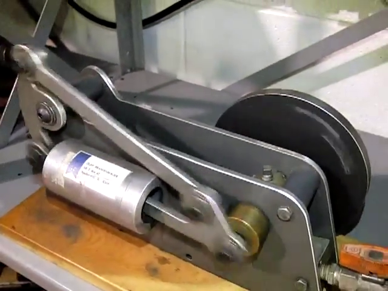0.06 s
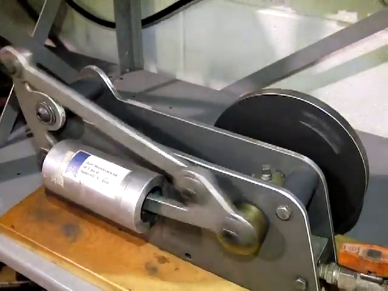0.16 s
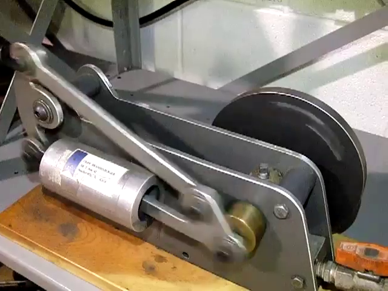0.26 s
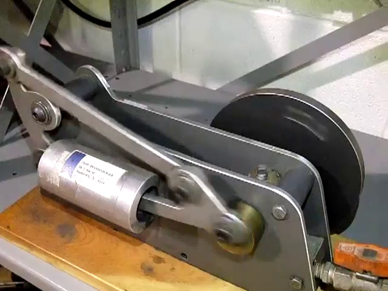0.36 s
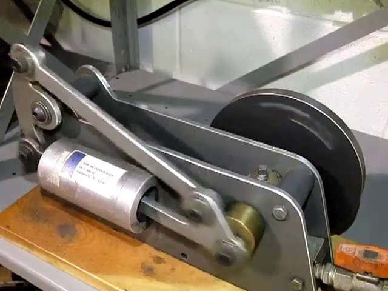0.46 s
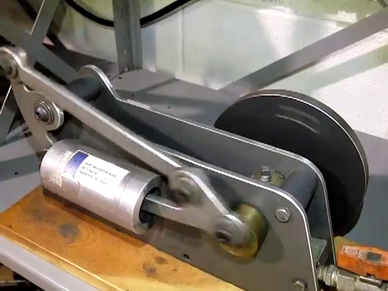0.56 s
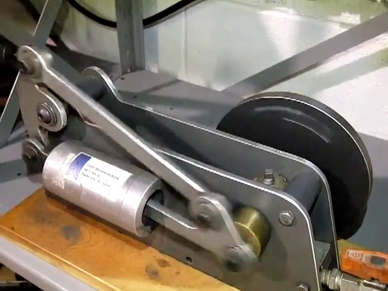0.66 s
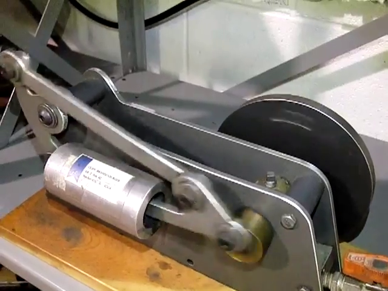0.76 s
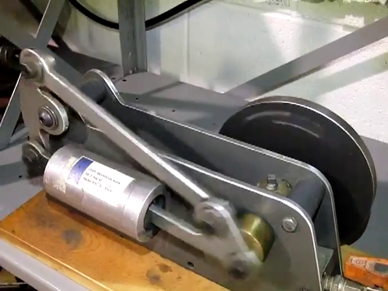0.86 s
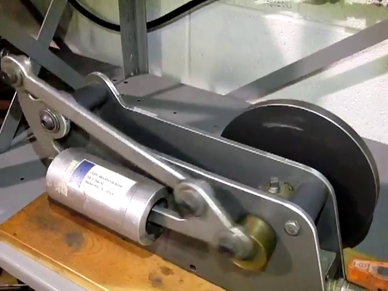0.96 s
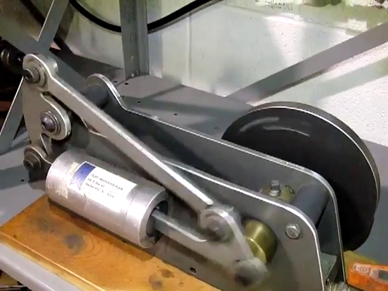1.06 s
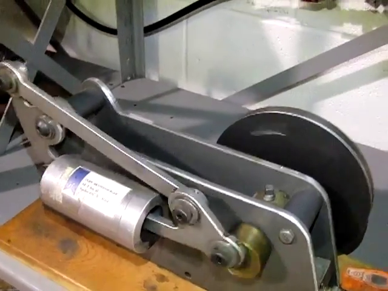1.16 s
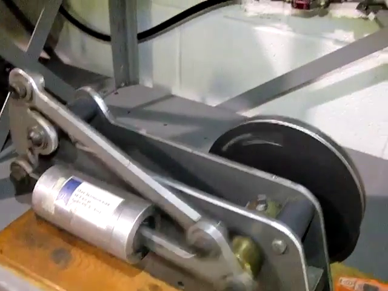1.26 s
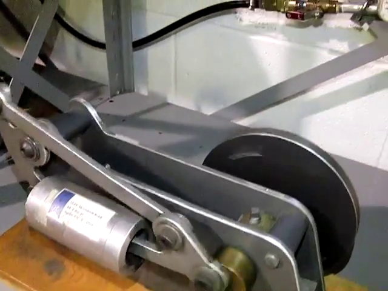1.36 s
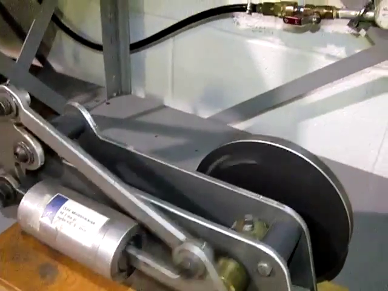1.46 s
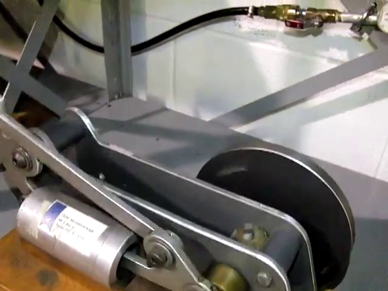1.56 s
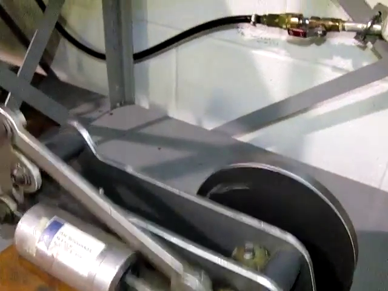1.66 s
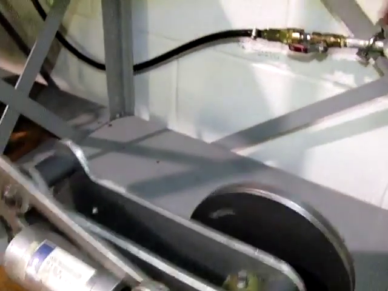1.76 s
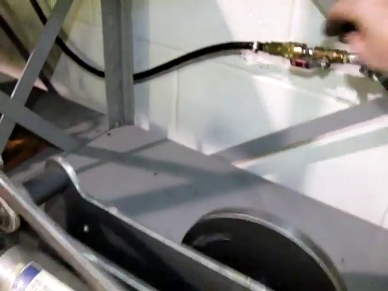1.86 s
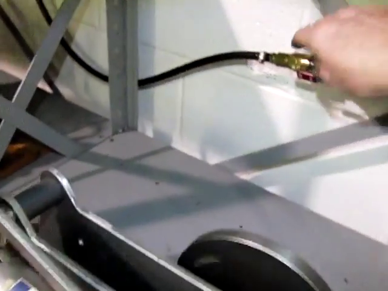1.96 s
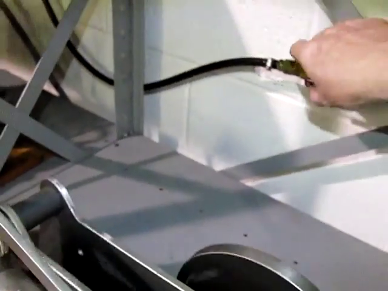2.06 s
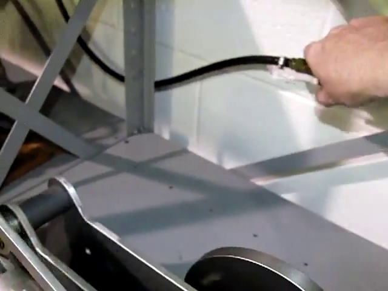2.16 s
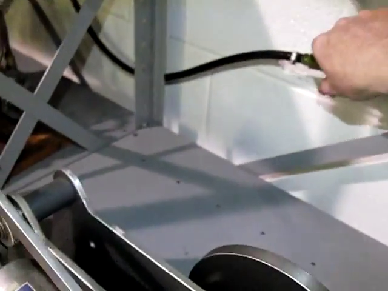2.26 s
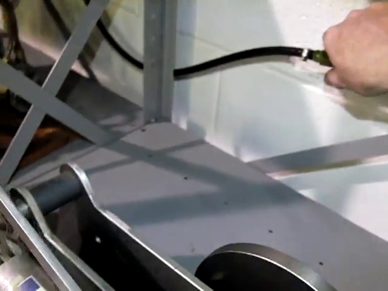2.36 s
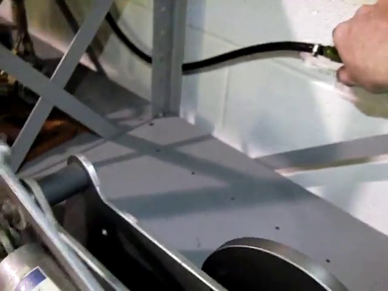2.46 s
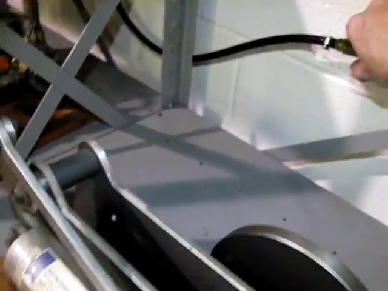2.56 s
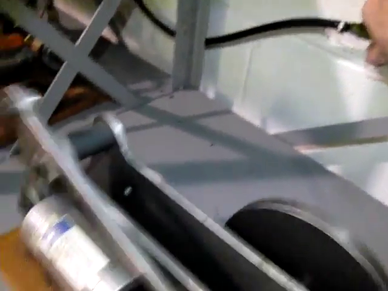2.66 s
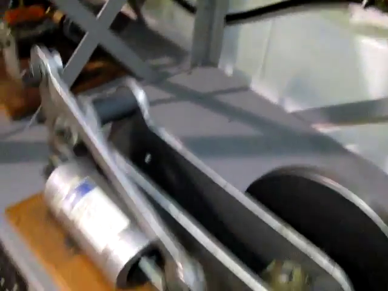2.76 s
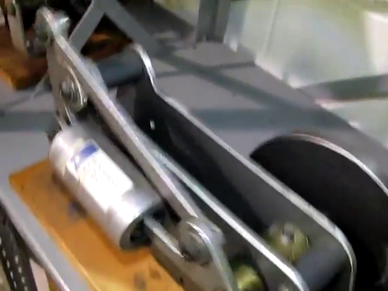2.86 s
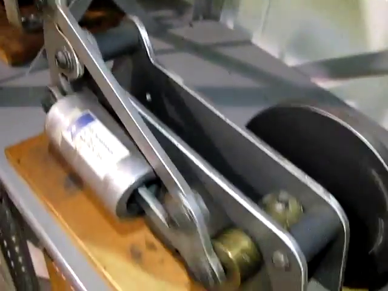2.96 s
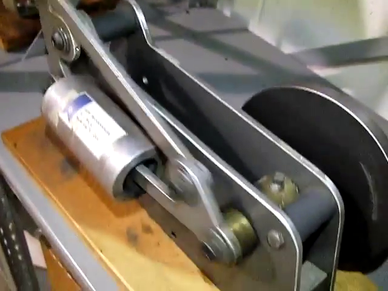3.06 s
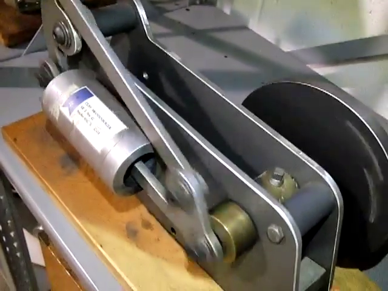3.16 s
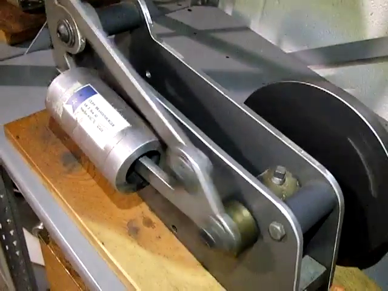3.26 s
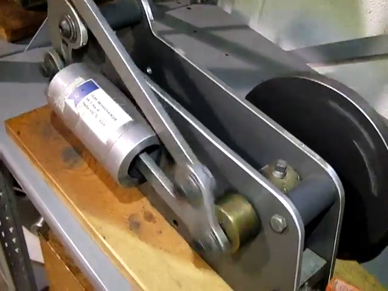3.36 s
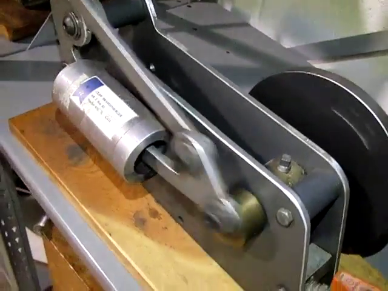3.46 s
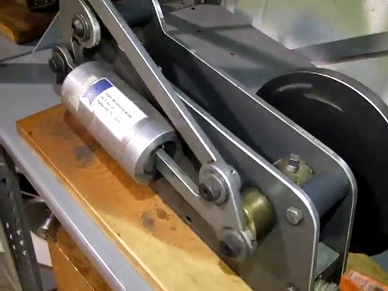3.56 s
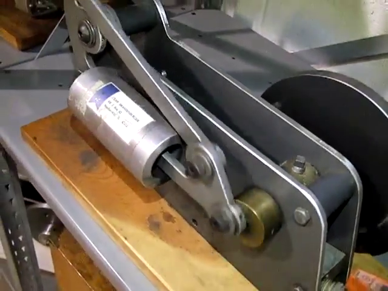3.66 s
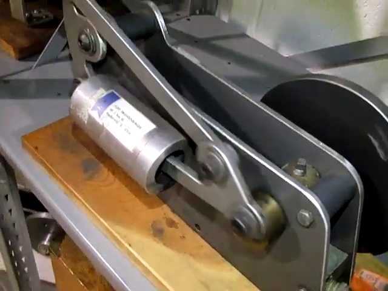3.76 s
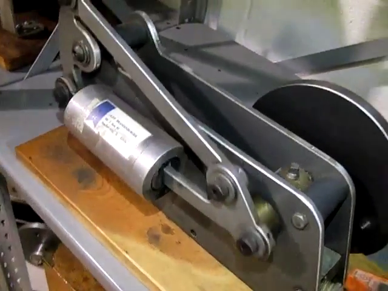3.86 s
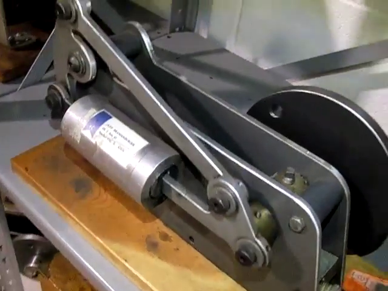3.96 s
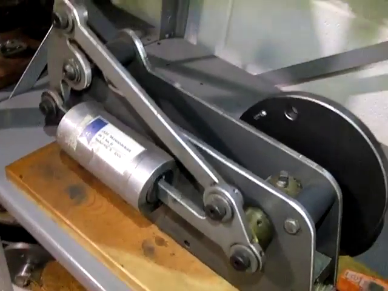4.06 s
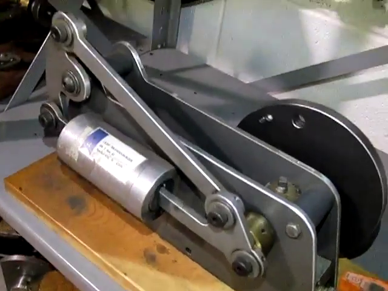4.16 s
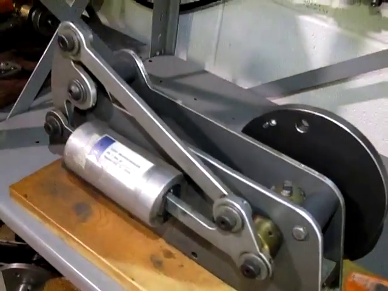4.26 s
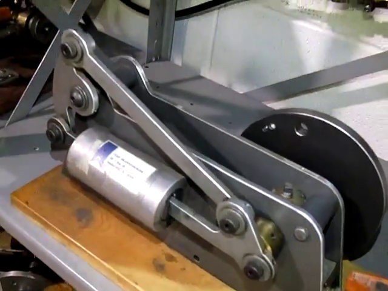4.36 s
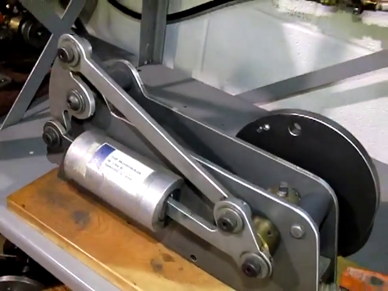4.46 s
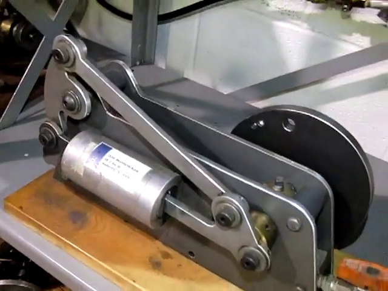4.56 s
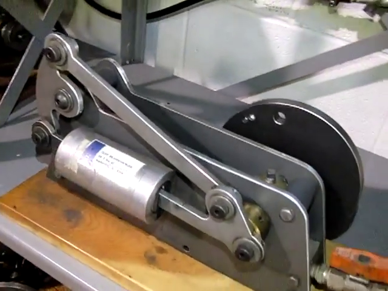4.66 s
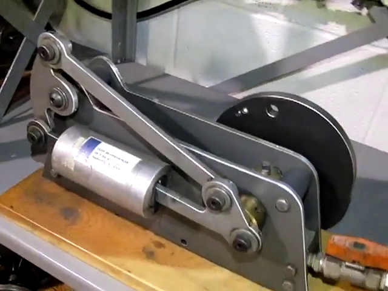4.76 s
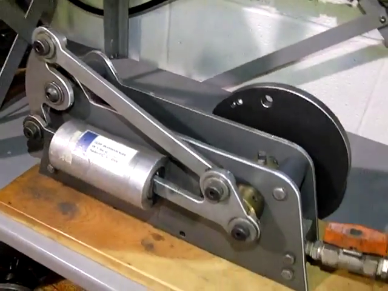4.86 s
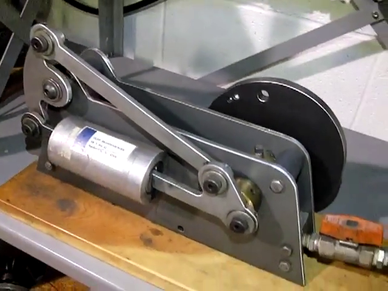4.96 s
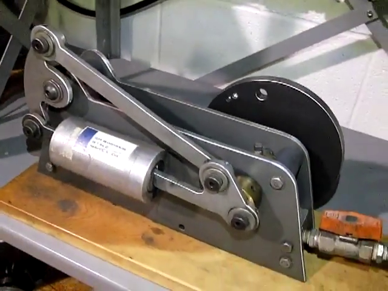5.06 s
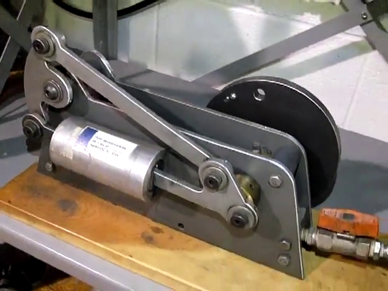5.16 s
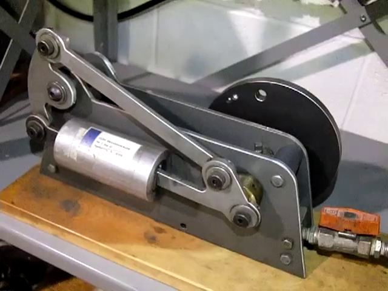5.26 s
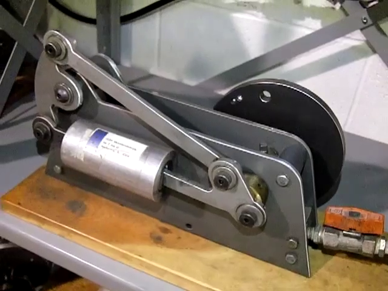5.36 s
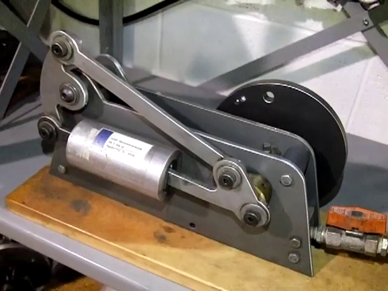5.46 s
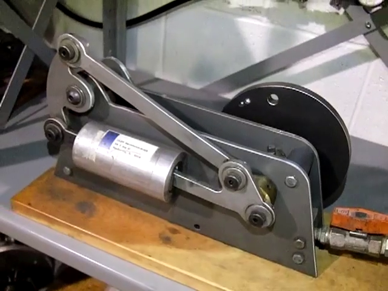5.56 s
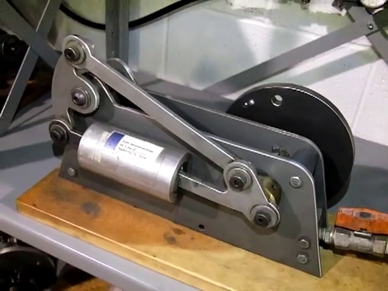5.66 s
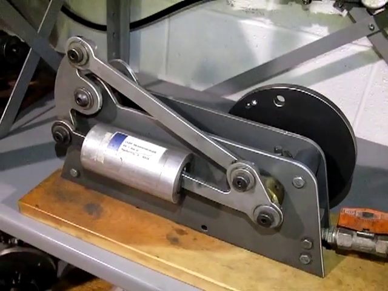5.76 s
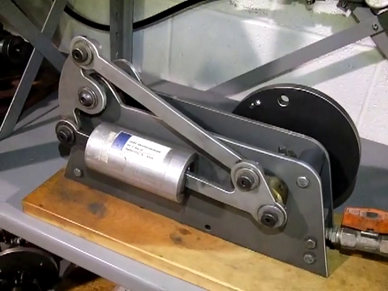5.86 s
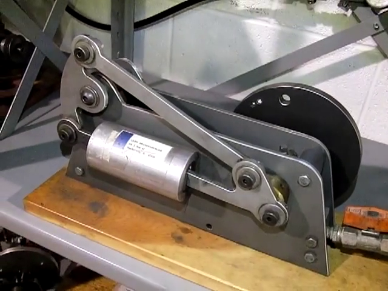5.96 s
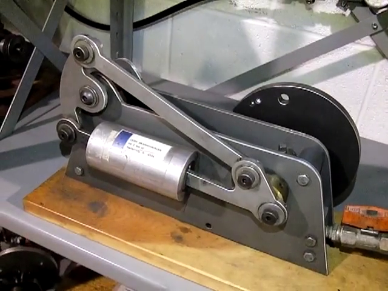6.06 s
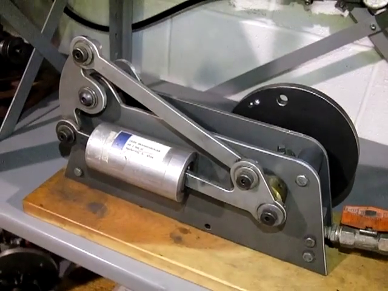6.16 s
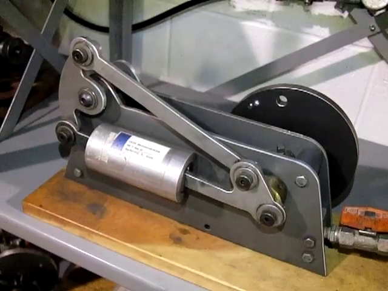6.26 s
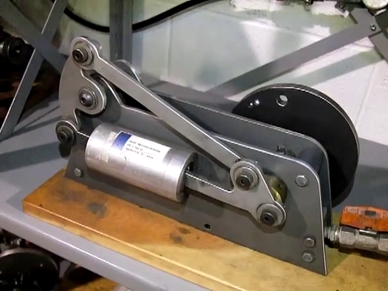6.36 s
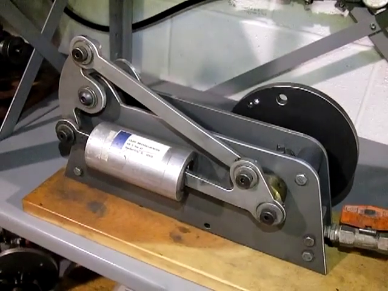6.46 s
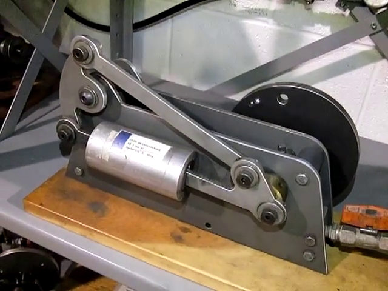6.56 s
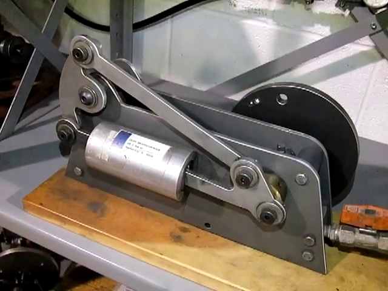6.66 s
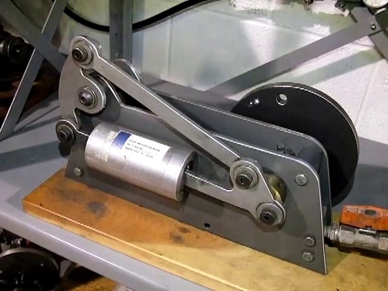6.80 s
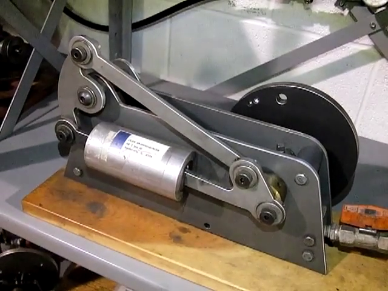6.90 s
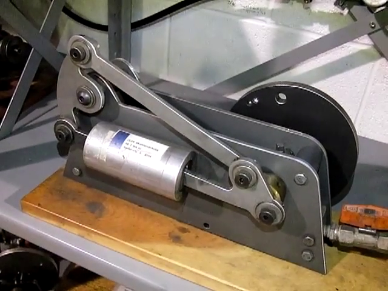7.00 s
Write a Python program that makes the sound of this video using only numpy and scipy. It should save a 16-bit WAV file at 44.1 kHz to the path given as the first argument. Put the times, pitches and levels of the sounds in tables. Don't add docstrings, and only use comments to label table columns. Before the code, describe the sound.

Close, rapid metallic knocking with puffing, hissing air stops after about four seconds; quiet ventilation rumble and lamp buzz remain, with one small tick.

```python
import sys
import numpy as np
from scipy import signal
from scipy.fft import rfft, irfft, next_fast_len
from scipy.io import wavfile
from scipy.ndimage import uniform_filter1d, map_coordinates

SR = 44100
rng = np.random.default_rng(int(sys.argv[2]) if len(sys.argv) > 2 else 0)


def nominal_scale(level):
    x = np.asarray(level, float) / 20
    return 10 ** x


def generate_wav(signal):
    frames = np.transpose(np.atleast_2d(signal))
    scaled = np.clip(frames, -1, 1) * 32767
    pcm = np.round(scaled).astype(np.int16)
    wavfile.write(sys.argv[1], SR, pcm)


N = 310023
T = np.arange(N) / SR

# dead centre t/s, blow level/dB, rebound level/dB, air pressure level/dB, valve snap level/dB
POWERED_TURNS = [(-0.011, -1, -5, -29, -16.5), (0.194, -4, -7, -29, -15.5), (0.4, -5, -5.5, -29, -19),
                 (0.606, -3, -7, -28, -15), (0.813, -3, -8.5, -29, -16.5), (1.02, -3.5, -6, -29, -17.5),
                 (1.227, -2.5, -7, -29, -15.5), (1.434, -2.5, -7, -29.5, -17),
                 (1.64, -3.5, -6.5, -27.5, -16.5), (1.847, -1.5, -4.5, -28.5, -15.5),
                 (2.053, -2.5, -3, -28, -19), (2.26, -3.5, -3.5, -27, -12), (2.466, -1.5, -5.3, -28, -13),
                 (2.674, -2, -5, -28, -12), (2.88, -1.4, -3.5, -26.5, -15), (3.087, -1, -6.5, -25.5, -12),
                 (3.294, -0.3, -5, -27, -12.5)]
# dead centre t/s, valve snap t/s, air pressure level/dB, snap level/dB
COASTING_TURNS = [
    (3.502, 3.705, -32.5, -19),
    (3.778, 3.875, -43.5, -60),
]
# t/s after dead centre, links level/dB, side plates level/dB, valve spit level/dB
TURN_CONTACTS = [
    (-0.017, -26, -23, -30),
    (0.0, -0.2, -16, -11),
    (0.0095, -1.1, -6.5, -15),
    (0.051, -19.5, -21.5, -55),
    (0.063, -12, -24.5, -55),
    (0.0885, -16, -13.5, -22),
    (0.109, -23, -24, -50),
]
# t/s, links level/dB, side plates level/dB, valve spit level/dB
COASTING_CONTACTS = [
    (3.485, -22, -52, -60),
    (3.505, -6, -13, -32),
    (3.514, -7.5, -42, -34),
    (3.557, -10.5, -12, -44),
    (3.603, -12.5, -14, -9.5),
    (3.743, -23.5, -19, -42),
    (3.783, -20, -24, -39),
    (3.827, -16.5, -19.5, -49),
    (3.831, -25, -41, -58),
    (4.032, -23, -20, -58),
]
# crank angle [0-1], level/dB
AIR_FLOW = [(0.02, 0.8), (.21, -1.5), (.3, -19), (.4, -6), (.5, -13.5), (.64, -2), (.755, 2.5), (.88, -6),
            (.965, -17)]
# t/s, level/dB
SHAKE = [(0.0, -28.5), (0.12, -40), (0.19, -33.5), (0.7, -36), (1.69, -34.5), (3.06, -32), (3.33, -30.5),
         (3.44, -34.5), (3.56, -28.5), (3.7, -39.5), (3.85, -38), (4.1, -61)]
# f/Hz, width f/Hz, level/dB
LINK_MODES = [(861, 100, -4), (917, 350, -8.5), (1306, 107, 0.5), (1403, 182, -2), (1720, 233, -6.5),
              (1913, 120, -2), (2160, 270, -6)]
# f/Hz, width f/Hz, level/dB
STEEL_EDGE_MODES = [(1330, 830, 0.3), (3470, 710, 1)]
# f/Hz, width f/Hz, level/dB
PLATE_MODES = [(526, 26, -6), (667, 30, 2), (755, 70, -17)]
# f/Hz, width f/Hz, level/dB
BENCH_MODES = [(43, 4.1, -3.5), (140.3, 31.4, -3), (196.4, 19, -2.5), (263, 61.5, -5.5), (366.5, 17.4, -1),
               (436.7, 92, -8)]
# f/Hz, width f/Hz, level/dB
THROAT_MODES = [(1373, 1000, -4), (2230, 630, 1), (3080, 400, 3.65), (3640, 626, 3), (4400, 384, -1.5),
                (5020, 730, -11)]
# f/Hz, width f/Hz, level/dB
OUTLET_MODES = [(1430, 420, -6.3), (1850, 224, -3), (2330, 225, 2.5)]
# f/Hz, width f/Hz, level/dB
JET_MODES = [(10500, 1460, 2), (11100, 1900, 3), (12140, 2800, -5)]
# f/Hz, width f/Hz, level/dB
WHISTLE_MODES = [(11000, 440, -19), (11700, 160, -6), (10930, 1530, -11), (14100, 1200, -17)]
# f/Hz, width f/Hz, level/dB
TICK_MODES = [(900, 240, -5), (1790, 52, 8), (2070, 80, 5.5), (2500, 70, 11.5), (3250, 270, -3.5),
              (6000, 3000, -21), (10700, 2500, -20)]
# t/s, level/dB
TICK_TIMES = [
    (4.896, -22.5),
    (4.904, -25),
    (4.913, -42),
    (4.925, -30),
    (4.934, -38),
    (5.57, -45),
    (5.76, -45),
    (6.23, -46),
]
# f/Hz, likeness [0-1]
ENGINE_LIKENESS = [(60, .99), (250, 1), (500, 0.91), (1000, 0.73), (3000, 0.8), (7500, 0.74), (10500, 0.85),
                   (15000, 0.74)]
# f/Hz, likeness [0-1]
ROOM_LIKENESS = [(60, 1), (300, 0.58), (800, 0.033), (3000, 0.75), (15000, 0.75)]
# f/Hz, time to fall 60 dB t/s
ECHO_DECAY = [(150, 0.53), (1000, 0.047), (8000, 0.028)]
# f/Hz, level/dB per Hz
RUMBLE_COLOUR = [(12, -26), (25, 5.5), (45, 0), (110, 0), (145, -9.5), (250, -14), (500, -23.5),
                 (1000, -26.5), (2200, -34.5), (3500, -32.5), (6000, -35.5), (15800, -39)]
# overtone of the buzz pitch [number], level/dB
LAMP_OVERTONES = [(1, -52.5), (2, -64.5), (3, -49), (4, -72), (7, -77), (9, -74.5), (10, -64.5), (11, -80),
                  (12, -69.5), (14, -62), (15, -64), (16, -68.5), (17, -69), (18, -75), (19, -67.5),
                  (21, -73), (22, -76)]
# t/s, level/dB
LAMP_OPENS = [(4.3, -0.5), (5.0, 7.5)]
# f/Hz, left leads [radians]
STEREO_LEAD = [(0, 0), (430, -.3), (780, -.1), (1210, -1.8), (1810, -2.3), (2760, -3.1), (15300, -3.2)]
# f/Hz, left minus right level/dB
STEREO_LEAN = [(60, 2.5), (110, -1.5), (200, 0), (380, 1.5), (700, 2.5), (1290, 2), (2380, -5), (4400, -1),
               (8120, -1.5), (15000, -1.5)]
# f/Hz, width f/Hz
MIC_NOTCHES = [(2860, 466), (4990, 160)]
# f/Hz, level/dB per Hz
MIC_HISS = [(700, -22), (1600, -3.5), (2400, -3), (3500, -23), (10000, -21), (13500, -21), (15800, -2)]

REST_S, SNAP_ANGLE = 4.006, 0.755
SNAP_AFTER_S = 0.1595
INTAKE_OVER_DB, EXHAUST_OVER_DB = 1.36, 0.5
WHISTLE_GROWS, WHISTLE_DB = 1.16, -5.5
POP_DB, POP_ANGLE = 8, 0.0067
PER_TURN = 7
BLOW, REBOUND = 1, 2
SCATTER_DB, SCATTER_S = 2.5, 0.000818
RING_FADES_DB_PER_S = 0.56
SHORTER_PER_DB, CHATTER_RISE_S = 1.12, 0.001
ROLL_OUT_S, ROLL_OUT_DB_PER_S = 3.86, 170
MAINS_HZ, SCAN_HZ = 120.02, 15734.3
UPPER_ORDER = 16
LOW_CUT_HZ = 30
FRAME = 256


def unit(x):
    return x / np.sqrt(np.mean(x ** 2) + 1e-20)


def along(points, hz):
    f, value = np.transpose(points)
    return np.interp(np.log(hz + 1), np.log(f + 1), value)


def filtered(x, response):
    size = next_fast_len(N + SR // 4)
    spectrum = rfft(x, size) * response(np.fft.rfftfreq(size, 1 / SR))
    return irfft(spectrum, size)[..., :N]


def body(modes):
    def response(f):
        total = 0
        for k, (centre, width, db) in enumerate(modes):
            damping = 1j * f * width
            total = total + (-1) ** k * nominal_scale(db) * damping / (centre ** 2 - f ** 2 + damping)
        return total
    return response


def wobble(rate):
    knots = rng.standard_normal(int(N * rate / SR) + 4)
    return map_coordinates(knots, [np.arange(N) * rate / SR])


def rush(response, alike, patchy_db):
    z = signal.stft(rng.standard_normal((2, N)), nperseg=FRAME)[2]
    patches = uniform_filter1d(rng.standard_normal(z.shape[1:]), size=2, axis=0)
    patches = uniform_filter1d(patches, size=8, axis=1)
    pair = signal.istft(z * nominal_scale(patchy_db * unit(patches)), nperseg=FRAME)[1][:, :N]

    def spread(hz):
        turn = np.arccos(np.clip(along(alike, hz), -1, 1)) / 2
        return response(hz) * np.array([np.cos(turn), np.sin(turn)])
    mid, side = filtered(pair, spread)
    return unit(np.array([mid + side, mid - side]))


def blows(times, dbs, t60, rough, fresh):
    t = np.arange(SR // 30) / SR
    share = np.clip(rough, 0, 1)
    habit = rng.standard_normal((PER_TURN, len(t)))[np.arange(len(times)) % PER_TURN]
    chatter = habit + fresh * rng.standard_normal((len(times), len(t)))
    chatter *= nominal_scale(-60 * t / t60) * (1 - np.exp(-t / CHATTER_RISE_S))
    shape = np.sqrt(share) * chatter / np.linalg.norm(chatter, axis=1, keepdims=True)
    shape[:, 0] = np.sqrt(1 - share)
    at = np.round(np.abs(times) * SR).astype(int)[:, None] + np.arange(len(t))
    pushes = nominal_scale(dbs)[:, None] * shape
    return np.bincount(at.ravel(), pushes.ravel(), N + SR)[:N]


def knocks():
    start, blow_db, rebound_db = np.transpose(POWERED_TURNS)[:3]
    rows = np.tile(TURN_CONTACTS, (len(start), 1, 1))
    luck = rng.standard_normal(rows.shape)
    small = ~np.isin(np.arange(PER_TURN), [BLOW, REBOUND])[:, None]
    rows += small * luck * [SCATTER_S, SCATTER_DB, SCATTER_DB, SCATTER_DB]
    rows[:, :, 0] += start[:, None]
    rows[:, BLOW, 1:] += blow_db[:, None]
    rows[:, REBOUND, 1] += rebound_db
    rows[:, REBOUND, 2] -= RING_FADES_DB_PER_S * start
    powered = rows.reshape(-1, len(TURN_CONTACTS[0]))[REBOUND:]
    return np.transpose(np.vstack([powered, COASTING_CONTACTS]))


def linkage(contacts):
    s, db, ring_db, spit_db = contacts
    shorter = nominal_scale(SHORTER_PER_DB * db.clip(-30, 0))[:, None]
    links = blows(s, db + 36.5, t60=0.029 * shorter, rough=0.56, fresh=0.99)
    edge = blows(s, db + 22, t60=0.0077, rough=0.66, fresh=0.47)
    plate = blows(s, ring_db + 43, t60=0.012, rough=0.12, fresh=0.5)
    spit = blows(s, spit_db + 24.5, t60=0.036 * shorter, rough=0.82, fresh=4.9)
    links = filtered(links, lambda f: body(LINK_MODES)(f) / (1 + 1j * f / 4000) ** 3)
    edge = filtered(edge, lambda f: body(STEEL_EDGE_MODES)(f) / (1 + 1j * f / 4500) ** 4)
    plate = filtered(plate, lambda f: body(PLATE_MODES)(f) / (1 + 1j * f / 900) ** 2)
    spit = filtered(spit, lambda f: body(JET_MODES)(f) + 0.7 * body(THROAT_MODES)(f))
    return links + edge + plate + spit


def bench(contacts):
    s, db = contacts[:2]
    push = blows(s, db + 34, t60=0.039, rough=0.84, fresh=0.19)
    return filtered(push, lambda f: body(BENCH_MODES)(f) / (1 + 1j * f / 700) ** 2)


def valve_snap(snap, snap_db):
    nearest = np.searchsorted((snap[1:] + snap[:-1]) / 2, T)
    since = T - snap[nearest]
    fade_s = np.where(since < 0, 0.008, 0.006)
    burst = nominal_scale(snap_db[nearest] - 3.5) * np.exp(-(since / fade_s) ** 2)
    low_part = body([(6100, 900, 0), (8000, 3000, -4)])
    colour = lambda f: body(WHISTLE_MODES)(f) + nominal_scale(-20) * low_part(f)
    return since, burst * nominal_scale(0.8 * wobble(250)) * rush(colour, ENGINE_LIKENESS, patchy_db=2.5)


def air():
    powered = [(s, s + SNAP_AFTER_S, air_db, snap_db) for s, _, _, air_db, snap_db in POWERED_TURNS]
    start, snap, air_db, snap_db = np.transpose(powered + COASTING_TURNS)
    turn = np.arange(len(start))

    marks = np.append(np.transpose([start, snap]).ravel(), REST_S)
    turned = np.append(np.transpose([turn, turn + SNAP_ANGLE]).ravel(), len(turn) - 0.02)
    angle = np.interp(T, marks, turned) % 1
    flow_levels = np.transpose([air_db + INTAKE_OVER_DB, air_db + EXHAUST_OVER_DB]).ravel()
    pressure = np.interp(T, marks[:-1] + np.tile([0.03, 0], len(turn)), flow_levels)
    pressure -= 300 * np.clip(T - REST_S + 0.03, 0, 1)

    flow_db = np.interp(angle, *np.transpose(AIR_FLOW), period=1)
    pop_db = POP_DB * np.exp(-angle / POP_ANGLE)
    throat = nominal_scale(pressure + flow_db + pop_db + 2.5 + 1.0 * wobble(50))
    hiss = nominal_scale(pressure + WHISTLE_GROWS * flow_db + WHISTLE_DB + 2.0 * wobble(100))

    outward = np.clip((angle - 0.4) / 0.11, 0, 1) * np.clip((0.95 - angle) / 0.33, 0, 1)
    steep = lambda modes: lambda f: body(modes)(f) * body([(11500, 7000, 0)])(f)
    jet = rush(steep(JET_MODES), ENGINE_LIKENESS, patchy_db=1.5)
    whistle = rush(steep(WHISTLE_MODES), ENGINE_LIKENESS, patchy_db=-7.5)
    tone = (1 - outward) * jet + outward * whistle

    since, snaps = valve_snap(snap, snap_db)
    emptying = nominal_scale(-5.0) * outward * np.where(since < 0, 1, 0.4)
    emptying = emptying * rush(body(OUTLET_MODES), ENGINE_LIKENESS, patchy_db=4.5)
    passage = (1 - 0.29 * outward) * rush(body(THROAT_MODES), ENGINE_LIKENESS, patchy_db=3.5)
    return throat * (passage + emptying) + hiss * tone + snaps


def bearings():
    s, db = np.transpose(SHAKE)
    shake_db = np.interp(T, s, db)
    frame = lambda f: body(LINK_MODES)(f) + 1.04 * body(PLATE_MODES)(f) + 1.72 * body(BENCH_MODES)(f)
    roll_out_db = ROLL_OUT_DB_PER_S * np.clip(T - ROLL_OUT_S, 0, 1)
    rattle = nominal_scale(shake_db - roll_out_db - 1.5 + 3.8 * wobble(90))
    rattle = rattle * rush(frame, ENGINE_LIKENESS, patchy_db=1.0)
    drone_hz = 140.3 + 0.69 * wobble(12)
    drone = np.sin(2 * np.pi * np.cumsum(drone_hz) / SR)
    drone = nominal_scale(shake_db + 3.0 + 0.32 * wobble(33)) * drone
    return (T < s[-1]) * (rattle + drone)


def ticks():
    s, db = np.transpose(TICK_TIMES)
    taps = filtered(blows(s, db + 30.5, t60=0.025, rough=0.57, fresh=5.2), body(TICK_MODES))
    wisp = nominal_scale(-58) * np.exp(-((T - 5.025) / 0.02) ** 2)
    leak = unit(filtered(rng.standard_normal(N), lambda f: body([(10500, 900, 0)])(f) ** 2))
    return taps + wisp * leak


def shop(x):
    hz, t, z = signal.stft(rng.standard_normal((2, SR // 2)), SR, nperseg=256)
    decay = nominal_scale(-60 * t / along(ECHO_DECAY, hz)[:, None])
    tail = signal.istft(z * decay, SR, nperseg=256)[1]
    late = np.pad(x, (200, 0))[None]
    return signal.fftconvolve(late, tail / np.linalg.norm(tail[0]), axes=1)[:, :N]


def lamp():
    cycle = np.linspace(0, 1, 4097)
    order, db = np.transpose(LAMP_OVERTONES)
    order = np.round(order)[:, None]
    phase = 2 * np.pi * rng.random((len(order), 1))
    tones = nominal_scale(db)[:, None] * np.sqrt(2) * np.sin(2 * np.pi * order * cycle + phase)
    upper = order[:, 0] >= UPPER_ORDER
    place = MAINS_HZ * T % 1
    low = np.interp(place, cycle, tones[~upper].sum(axis=0))
    high = np.interp(place, cycle, tones[upper].sum(axis=0))
    buzz = low + high * nominal_scale(np.interp(T, *np.transpose(LAMP_OPENS)))
    return buzz * nominal_scale(0.4 * wobble(6.6))


def background():
    whine = nominal_scale(-61 + 0.8 * wobble(8)) * np.sin(2 * np.pi * SCAN_HZ * T)
    rumble = rush(lambda f: nominal_scale(along(RUMBLE_COLOUR, f)), ROOM_LIKENESS, patchy_db=-0.5)
    rumble = nominal_scale(-42 + 0.71 * wobble(3.97)) * rumble
    return rumble + lamp() + whine * nominal_scale([[0], [-10]])


def scene():
    contacts = knocks()
    metal = linkage(contacts)
    tick = ticks()
    near = metal + tick * nominal_scale([[-5], [-1]]) + bench(contacts)
    return near + nominal_scale(-13.5) * shop(metal + tick) + air() + bearings() + background()


def roll_off(x):
    return signal.sosfilt(signal.butter(12, 15760, fs=SR, output="sos"), x)


def record(dry):
    half = np.array([[0.5], [-0.5]])
    wide = lambda f: nominal_scale(half * along(STEREO_LEAN, f)) * np.exp(1j * half * along(STEREO_LEAD, f))
    hiss = nominal_scale(-60.5) * rush(lambda f: nominal_scale(along(MIC_HISS, f)), [(1000, 0.05)], patchy_db=3.0)

    def microphone(f):
        notches = np.prod([1 - body([(centre, width, 0)])(f) for centre, width in MIC_NOTCHES], axis=0)
        return notches * (f / (f - 1j * LOW_CUT_HZ)) ** 2
    heard = filtered(filtered(dry, wide) + hiss, microphone)
    heard = heard / (1 + np.abs(heard / 0.9) ** 6) ** (1 / 6)
    return roll_off(heard)


dry = scene()
out = record(dry)
generate_wav(out)
```